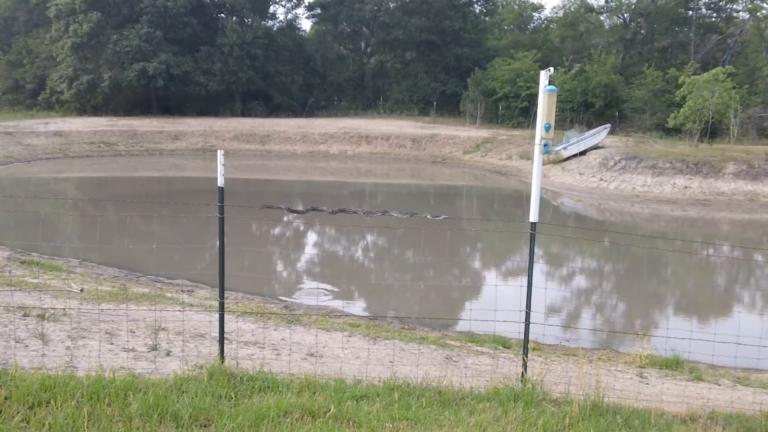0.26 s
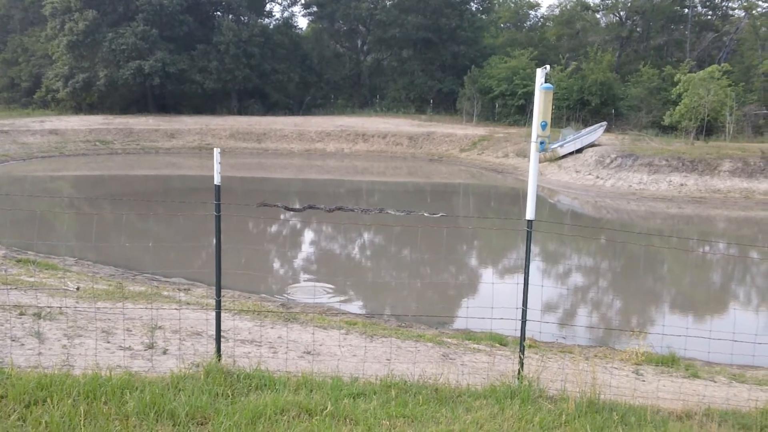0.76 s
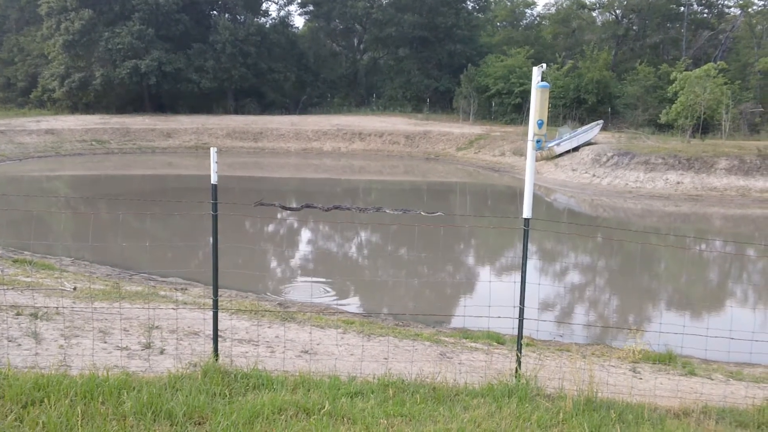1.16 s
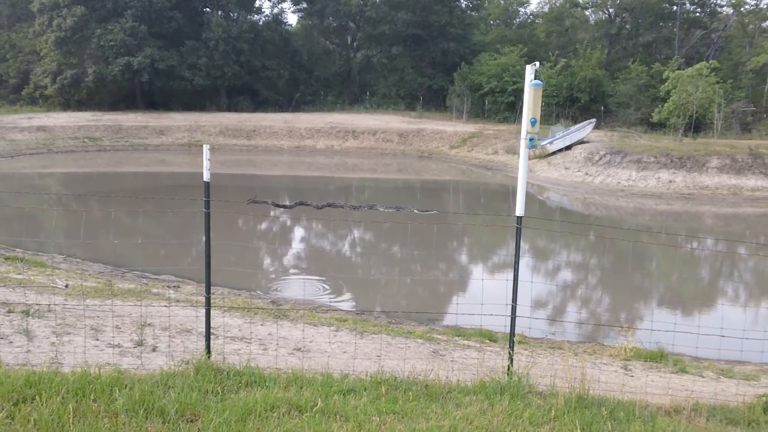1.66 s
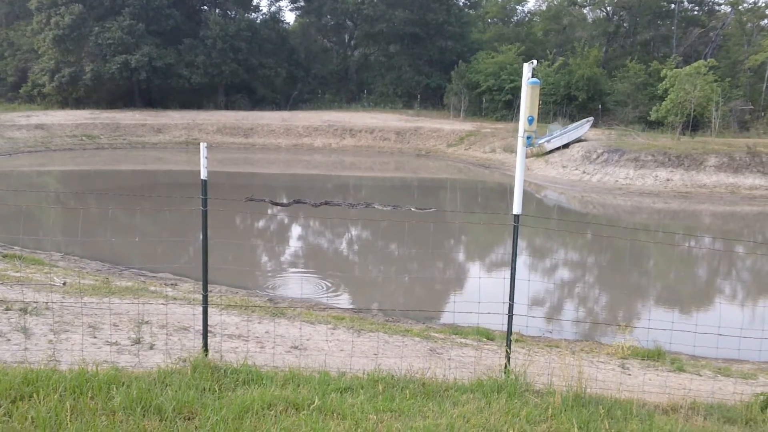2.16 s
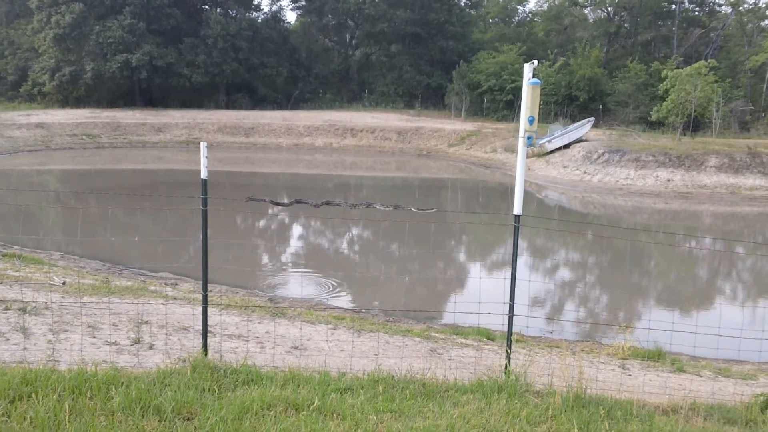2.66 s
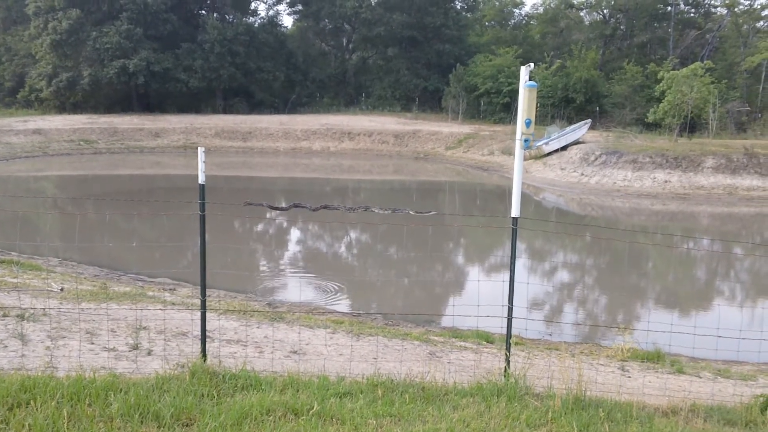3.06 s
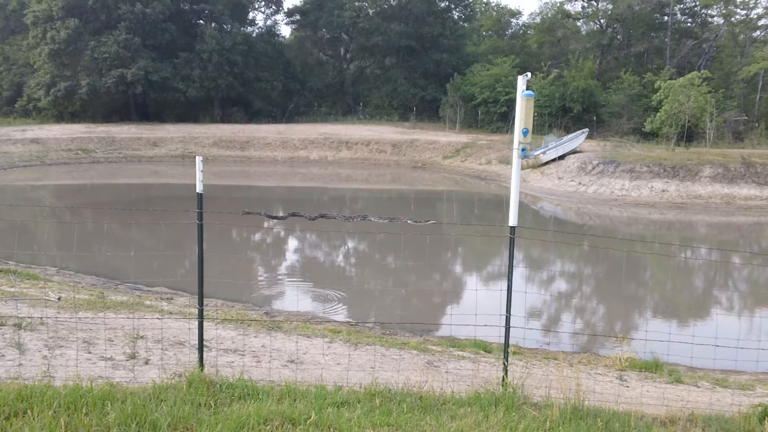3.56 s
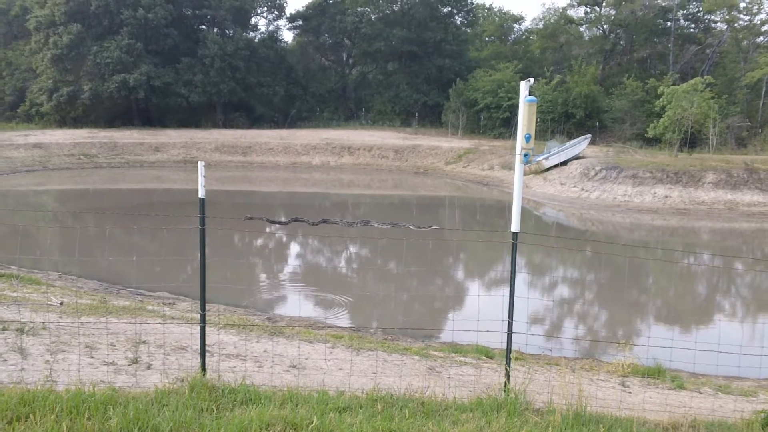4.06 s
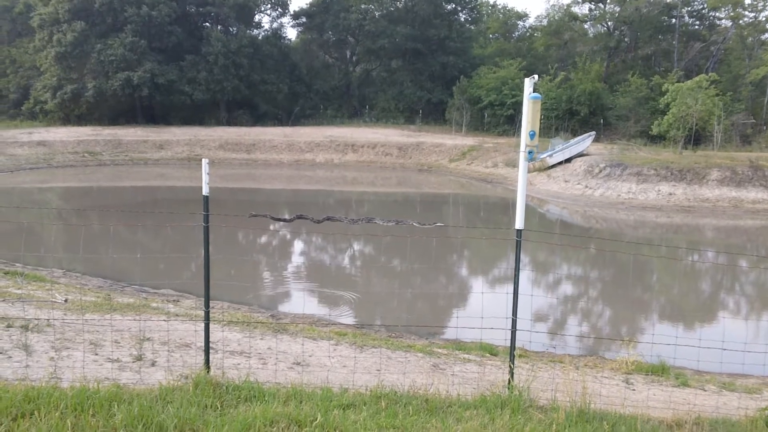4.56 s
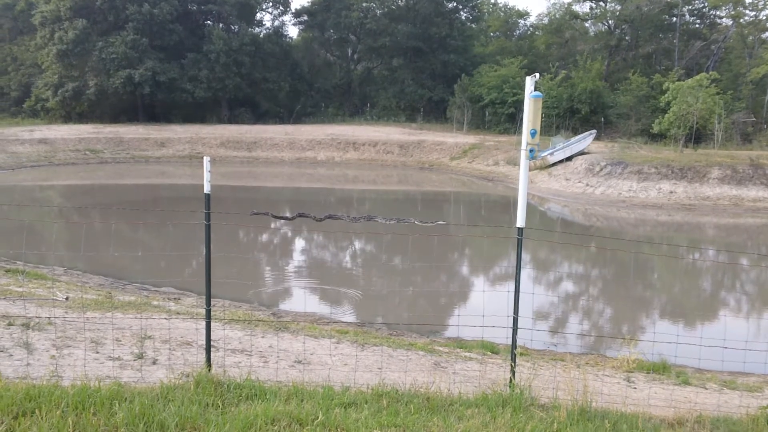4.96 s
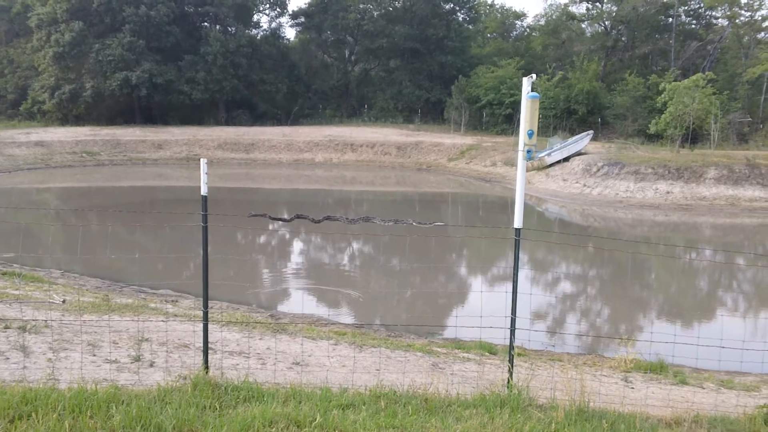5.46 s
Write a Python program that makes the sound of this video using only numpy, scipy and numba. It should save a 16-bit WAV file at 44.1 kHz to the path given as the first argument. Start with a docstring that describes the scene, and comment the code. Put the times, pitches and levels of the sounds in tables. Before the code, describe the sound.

At a pond beside a wood, insects keep up a steady high drone while a katydid ticks nearby and small birds chip. Three clear whistles sound, joined by softer falling notes. Then one bird, and soon a second, repeats a quick chirping phrase that echoes off the trees. Gusts of wind rumble and thump on the hand-held microphone, hardest just past the middle, over a faint distant motor hum.

```python
"""A farm pond at the edge of a wood, from a hand-held camera's microphone on the bank.
Air, a far motor and an insect drone are there from the start, with small birds chipping in the foliage.
A katydid starts ticking close by and a bird scolds. From 0.8 s come three long whistles, joined by
falling slurs, then a twitter; from 2.6 s one singer, then two, repeat a quick phrase, echoed by the trees.
Wind buffets the microphone, hardest at 3.7 s, where the gain control ducks and slowly recovers."""
import sys
import numpy as np
from scipy import signal
from scipy.fft import rfft, irfft
from scipy.io import wavfile
from scipy.ndimage import uniform_filter1d
from numba import njit

SR = 44100
rng = np.random.default_rng(int(sys.argv[2]) if len(sys.argv) > 2 else 0)


def bounce(signal):
    """Save signal as a 16-bit WAV file at the path given by the first command-line argument."""
    frames = np.transpose(np.atleast_2d(signal))
    limited = np.clip(frames, -1, 1)
    pcm = np.round(limited * 32767).astype(np.int16)
    wavfile.write(sys.argv[1], SR, pcm)


N = 251808
TIME = np.arange(N) / SR


def undb(db):
    """Decibels to gain."""
    return 10 ** (np.asarray(db) / 20)


def level(x, db):
    """Scale to an rms level."""
    return x * undb(db) / np.sqrt(np.mean(x ** 2))


def add(out, s, x):
    """Mix a sound in at s seconds."""
    i = max(int(s * SR), 0)
    out[i:i + len(x)] += x[:max(N - i, 0)]


def walk(rate_hz):
    """Smooth random wandering with a spread near 1."""
    k = int(SR / rate_hz)
    held = np.repeat(rng.standard_normal(N // k + 1), k)
    return level(uniform_filter1d(uniform_filter1d(held, k), k)[:N], 0)


def gain_at(hz, spectrum):
    """Gain of a (f/Hz, level/dB) spectrum at given frequencies."""
    f, db = np.transpose(spectrum)
    return undb(np.interp(np.log(hz + 1e-3), np.log(f), db))


def noise(spectrum):
    """Unit noise with a (f/Hz, level/dB) spectrum."""
    gain = gain_at(np.fft.rfftfreq(N, 1 / SR), spectrum)
    return level(irfft(rfft(rng.standard_normal(N)) * gain, N), 0)


def band(hz, width_hz):
    """Unit noise in one bell-shaped band."""
    bell = np.exp(-2 * ((np.fft.rfftfreq(N, 1 / SR) - hz) / width_hz) ** 2)
    return level(irfft(rfft(rng.standard_normal(N)) * bell, N), 0)


def phase_of(hz):
    """Running phase of a moving pitch."""
    return 2 * np.pi * np.cumsum(hz) / SR


def sing(contour, notes, waver=0.0021):
    """A bird's nearly pure tone follows the contour once for each (t/s, pitch factor, level/dB) note."""
    s, hz, db = np.transpose(contour)
    t = np.arange(s[0], s[-1], 1 / SR)
    swell = undb(np.interp(t, s, db)) * signal.windows.tukey(len(t), .1)
    pitch = uniform_filter1d(np.interp(t, s, hz), size=300)
    out = np.zeros(N)
    for start, factor, note_db in notes:
        unsteady = 1 + waver * walk(194)[:len(t)]
        add(out, start + s[0], undb(note_db) * swell * np.sin(phase_of(pitch * factor * unsteady)))
    return out


# open air and distant leaves: f/Hz, relative level/dB
AIR_SPECTRUM = [(20, -1.5), (60, 3.5), (170, -2), (350, -4.5), (720, -6), (1000, -11), (1700, -15),
                (3000, -18), (4500, -18), (6500, -23), (7600, -22.5), (9000, -25), (11000, -27),
                (15000, -29.5)]

def open_air(db=-45, flicker_db=0.63):
    """The air over the pond, faintly stirring."""
    return undb(db + flicker_db * walk(10)) * noise(AIR_SPECTRUM)


def far_motor(hz=122.5, db=-48, waver=0.02517, flutter_db=1.5):
    """A motor far off hums, slightly uneven in pitch and level."""
    hum = np.sin(phase_of(hz * (1 + waver * walk(14))))
    return level(hum * undb(flutter_db * walk(12)), db)


def insects(count=28, common_hz=5496, spread_hz=180, db=-51, stroke_hz=55, stroke_depth=0.8, swell_db=1.0):
    """Many insects, each a wing tone near the common pitch, pulsed at its own stroke rate."""
    drone = np.zeros(N)
    for offset in np.linspace(-2, 2, count):
        hz = common_hz + spread_hz * offset + 35 * walk(150)
        rate_hz = stroke_hz * rng.uniform(.65, 1.3) * (1 + 0.0303 * walk(5))
        strokes = 1 + stroke_depth * np.sin(phase_of(rate_hz))
        weight = np.exp(-(offset / 2) ** 2 * 0.92)  # loudest at the common pitch
        drone += weight * strokes * np.sin(phase_of(hz))
    return level(drone * undb(swell_db * walk(8)), db)


# strength of the wind on the bank: t/s, level/dB
GUSTS = [(0.0, -50), (0.17, -46), (0.52, -58.5), (1.57, -42), (1.72, -26), (1.89, -44), (2.05, -31.5),
         (2.45, -47), (3.23, -28.5), (3.45, -36), (3.62, -27.5), (3.86, -43), (4.15, -32.5), (4.26, -51),
         (4.68, -41.5), (4.72, -60), (4.79, -34), (4.86, -61), (5.07, -33), (5.14, -48.5), (5.37, -40),
         (5.71, -41)]
# wind rumble on the microphone: f/Hz, relative level/dB
RUMBLE_SPECTRUM = [(18, -30), (40, -4.5), (80, 2), (130, -3), (200, -14), (300, -20), (600, -53),
                   (1200, -72)]
# the hardest eddies that strike the microphone: t/s, peak level/dB, f/Hz
HARD_EDDIES = [(1.633, -20, 128), (1.724, -18, 124), (1.736, -11.5, 145), (2.04, -17.5, 164),
               (2.07, -16.5, 98), (2.128, -21.5, 150), (2.925, -20.5, 126), (3.008, -14.5, 152),
               (3.209, -17.5, 105), (3.396, -21.5, 120), (3.618, -15, 139.6), (3.654, -18, 113),
               (3.721, -7.5, 196), (3.737, -5.5, 198.6), (4.058, -20, 141), (4.103, -19, 187),
               (4.131, -22, 80), (4.191, -21.5, 129), (4.658, -17, 198), (4.793, -17.5, 137),
               (5.021, -19.5, 167), (5.055, -13, 176), (5.348, -18.5, 151), (5.404, -19.5, 194),
               (5.423, -20.5, 133), (5.656, -18.5, 144)]

def wind(count=70, rumble_db=-1, flutter_db=2.5, eddy_db=7, eddy_hz=135, knock_db=-15, knock_ratio=2.53):
    """Rumble and small eddies follow the gusts; each eddy is one swing of pressure between two dips."""
    gust_db = lambda s: np.interp(s, *np.transpose(GUSTS))
    out = noise(RUMBLE_SPECTRUM) * undb(gust_db(TIME) + rumble_db + flutter_db * walk(35))
    when, size, speed = rng.random((count, 3)).T
    times = (np.arange(count) + when) / count * N / SR
    small_eddies = zip(times, gust_db(times) + eddy_db + 6 * (size - .5), eddy_hz * 2 ** (speed - .5))
    t = np.arange(-.02, .02, 1 / SR)
    for s, db, hz in [*HARD_EDDIES, *small_eddies]:
        body = (np.pi * hz * t * .85) ** 2
        core = body * knock_ratio ** 2  # the tight core sharpens the crest into a knock
        swing = (1 - 2 * body) * np.exp(-body) + undb(knock_db) * (1 - 2 * core) * np.exp(-core)
        add(out, s + t[0], rng.choice([-1, 1]) * undb(db) * swing / swing.max())
    return out


# the clearest chips from the foliage, and the whistler's low rising note just after its first whistle: t/s,
# length/s, start f/Hz, middle f/Hz, end f/Hz, level/dB
CHIP_CALLS = [(0, .028, 7900, 7560, 7000, -51), (0, 0.022, 2520, 2500, 2450, -49.5),
              (.156, 0.026, 8100, 7140, 7000, -44), (.36, 0.069, 3650, 3400, 3300, -54),
              (.759, .025, 3700, 3400, 3120, -53), (.892, .041, 3860, 3550, 3100, -55),
              (1.062, 0.023, 1990, 2110, 2084, -44.5), (1.372, .16, 4160, 4090, 4030, -58),
              (1.46, .14, 2600, 2480, 2345, -50.5), (1.71, .04, 7300, 6900, 6300, -55),
              (3.007, 0.033, 6120, 5880, 5880, -41.5), (4.203, .07, 7500, 7380, 7100, -50),
              (4.218, 0.04, 6850, 6250, 6300, -45.5), (4.365, 0.061, 7100, 6900, 6800, -54),
              (4.409, 0.0295, 6920, 6200, 6150, -46), (4.515, 0.1, 7200, 6880, 6600, -52),
              (4.854, 0.026, 8160, 7300, 7260, -43), (5.27, .017, 6840, 7400, 7700, -48),
              (5.637, 0.054, 8200, 8060, 6400, -45)]

def chips(calls, rough=0.01):
    """Thin calls, mostly of small birds, each one curved and slightly husky sweep."""
    out = np.zeros(N)
    for s, length, *hz, db in calls:
        u = np.linspace(0, 1, int(length * SR))
        curve_hz = np.polyval(np.polyfit([0, .5, 1], hz, 2), u)
        pitch = curve_hz * (1 + rough * walk(720)[:len(u)])
        add(out, s, undb(db) * signal.windows.tukey(len(u), .5) * np.sin(phase_of(pitch)))
    return out


def far_chorus(count, low_hz, high_hz, db):
    """Birds deep in the wood: faint short whistles at any moment, mostly falling."""
    out = np.zeros(N)
    for when, pitch, length, fall in rng.random((count, 4)):
        u = np.linspace(0, 1, int((0.0303 + .06 * length) * SR))
        start_hz = low_hz + (high_hz - low_hz) * pitch ** 2
        hz = start_hz * (1 + (.04 - .2 * fall) * u)
        add(out, when * N / SR, undb(db) * np.sin(np.pi * u) * np.sin(phase_of(hz)))
    return out


# modes of a small katydid's wing: f/Hz, width/Hz, relative level/dB
WING_MODES = [(4000, 450, -15), (7700, 900, -13), (10650, 1100, 0), (14700, 1300, 3)]
# its runs of ticks: t/s, number of ticks
KATYDID_RUNS = [(.092, 3), (.412, 3), (.695, 3), (.879, 2), (1.183, 3), (1.504, 4), (1.844, 3), (2.128, 3),
                (2.315, 3), (2.596, 4), (3.235, 4), (3.574, 3), (3.86, 4), (4.197, 4), (4.422, 2),
                (4.896, 3), (5.087, 2), (5.365, 4)]

def katydid(db=-44, first_gap_s=.061, gap_s=.054, scatter=.012, uneven_db=2.5):
    """In the grass near the microphone: each tick is one wing snap, ringing for about a millisecond."""
    out, t = np.zeros(N), TIME[:SR // 200]
    for start, ticks in KATYDID_RUNS:
        for s in start + np.append(0, first_gap_s + gap_s * np.arange(round(ticks) - 1)):
            tune = 1 + scatter * rng.standard_normal()
            ring = sum(undb(mode_db) * np.exp(-np.pi * width * t) * np.sin(2 * np.pi * hz * tune * t)
                       for hz, width, mode_db in WING_MODES)
            add(out, s, undb(db + uneven_db * rng.standard_normal()) * ring)
    return out


# the scolding bird's throat: f/Hz, relative level/dB
THROAT_RESPONSE = [(2800, -10), (3500, -4), (3950, 5), (4400, 2), (4850, 1), (5600, -3), (6400, -30)]

def scolds(count=10, start_s=.153, every_s=.089, note_s=.06, top_hz=442, rise=.13, rough=0.0197,
           peak_s=0.41, peak_db=-51, fade_db_per_s=7.5):
    """Nasal notes swell and fade in the foliage: the throat passes a rising buzz's high harmonics."""
    out, u = np.zeros(N), np.linspace(0, 1, int(note_s * SR))
    for s in start_s + every_s * np.arange(count):
        db = peak_db - fade_db_per_s * abs(s - peak_s)
        hz = top_hz * (1 - rise * (1 - u) ** 2 + rough * walk(290)[:len(u)])
        phase = phase_of(hz)
        voice = sum(gain_at(k * hz, THROAT_RESPONSE) * np.sin(k * phase + rng.uniform(0, 2 * np.pi))
                    for k in range(6, 15))
        add(out, s, level(voice * signal.windows.tukey(len(u), .7), db))
    return out


# one long whistle: t/s from its start, f/Hz, relative level/dB
WHISTLE_CONTOUR = [(0, 2976, -0.5), (.012, 2730, -6), (.04, 2695, 1), (.115, 2698, 1.5), (.142, 2630, 0.5),
                   (.168, 2452, 0.5), (.176, 2330, -12)]
# each time it sounds: t/s, pitch factor, level/dB
WHISTLE_NOTES = [(0.832, 1, -37), (1.187, 1, -34.5), (1.552, .983, -35.5)]

def whistles():
    """Three long whistles carry across the pond, each held and then dropping in pitch."""
    return sing(WHISTLE_CONTOUR, WHISTLE_NOTES)


# short dry rasps: t/s, length/s, level/dB
RASP_CALLS = [(0.854, 0.11, -57), (4.052, 0.1, -57), (4.237, 0.27, -62), (4.7, .11, -59)]

def rasps(hz=7200, width_hz=1700):
    """Brief hissing calls from the trees."""
    swell = np.zeros(N)
    for s, length, db in RASP_CALLS:
        add(swell, s, undb(db) * signal.windows.tukey(int(length * SR), .5))
    return swell * band(hz, width_hz)


# one falling slur: t/s from its start, f/Hz, relative level/dB
SLUR_CONTOUR = [(0, 2720, -8), (.025, 2480, 2), (.055, 2150, 4), (.1, 1880, 3), (.13, 1730, -6.5)]

def slurs(count=6, start_s=1.072, every_s=.296, db=-54):
    """A bird farther from the microphone repeats its slur at an even pace."""
    return sing(SLUR_CONTOUR, [(start_s + k * every_s, 1, db) for k in range(count)])


def twitter(count=4, start_s=1.862, every_s=.095, note_s=.052, db=-51.5, fade_db_per_s=29):
    """One rising chip repeated in the foliage, softer each time."""
    sweep_hz = (3790, 4030, 4160)
    return chips([(start_s + t, note_s, *sweep_hz, db - fade_db_per_s * t)
                  for t in every_s * np.arange(count)])


# the three parts of a quick phrase: t/s from its start, f/Hz, relative level/dB
ARCH_CONTOUR = [(0, 2250, -10), (.01, 2459, -4), (.024, 2487, -0.5), (.038, 2458, 2.5), (.05, 2260, -5),
                (.057, 2180, -5.5)]
FLICK_CONTOUR = [(0.062, 2777, -16), (.069, 2611, -10.5), (.074, 2442, -3), (.079, 2340, -1.5),
                 (.087, 2080, -18)]
LIFT_CONTOUR = [(.087, 1994, -7), (.107, 2007, -7), (.127, 2080, 3.5), (.138, 2160, -3), (.148, 2150, -20)]
# two singers: first pitch factor, share of pitch lost per s, flick and lift level/dB against the arch
SINGER_VOICES = [(1.007, 0.0014, 1, -15), (1.012, 0.0538, 1.9, -6)]
# their phrases: t/s, arch level/dB, singer (0 or 1)
SONG_PHRASES = [(2.579, -37.5, 0), (2.773, -33.5, 0), (2.957, -31.5, 0), (3.135, -31.5, 0), (3.318, -32, 0),
                (3.506, -33, 0), (3.577, -37, 1), (3.697, -34.5, 0), (3.762, -35, 1), (3.937, -37, 1),
                (4.119, -36, 1), (4.3, -36, 1), (4.494, -36.5, 1), (5.621, -40.5, 0)]

def song(singer, pause_s=.3):
    """One bird's phrases, sagging in pitch: an arch, a downward flick and a low lift into the next."""
    factor, sag, flick_db, lift_db = SINGER_VOICES[singer]
    s, db = np.transpose([(s, db) for s, db, who in SONG_PHRASES if round(who) == singer])
    pitch = factor * (1 - sag * (s - s[0]))
    arches = sing(ARCH_CONTOUR, zip(s, pitch, db))
    flicks = sing(FLICK_CONTOUR, zip(s, pitch, db + flick_db))
    goes_on = np.append(np.diff(s) < pause_s, False)  # no lift before a pause
    lifts = sing(LIFT_CONTOUR, np.column_stack([s, pitch, db + lift_db])[goes_on])
    return arches + flicks + lifts


def wood(x, t60_s, db, build_s):
    """Trunks and leaves scatter a call into a tail that builds up and fades."""
    t = TIME[:SR]
    tail = rng.standard_normal(SR) * (1 - np.exp(-t / build_s)) * undb(-60 * t / t60_s)
    return undb(db) * signal.fftconvolve(x, tail / np.sqrt(np.sum(tail ** 2)))[:N]


def scene():
    """The pond as it reaches the bank: nearly mono, with a little width in the hiss."""
    first_singer, whistler = song(0), whistles()
    singers = first_singer + song(1) + whistler + slurs()
    add(singers, s=.083, x=undb(-8.5) * first_singer)  # echo off the tree line across the water
    singers += wood(singers, t60_s=0.17, db=-14, build_s=0.0053)  # branches around the perch
    singers += wood(singers, t60_s=1.7, db=-12.5, build_s=0.035)  # the wood beyond
    small_birds = chips(CHIP_CALLS) + twitter() + scolds() + rasps()
    small_birds += far_chorus(count=40, low_hz=1900, high_hz=3000, db=-59)
    small_birds += far_chorus(count=8, low_hz=3300, high_hz=4350, db=-60)
    small_birds += wood(small_birds, t60_s=0.42, db=-7.5, build_s=0.027)  # deep foliage blurs them more
    far_bank = wood(whistler, t60_s=1.34, db=-20, build_s=.2)
    mid = singers + small_birds + far_bank + insects() + katydid() + far_motor() + open_air() + wind()
    side = undb(-65) * noise([(60, -19), (500, 3.5), (3000, -2.5), (6000, -1.5), (9000, 3),
                              (11500, -8.5), (15000, -4)])
    return np.array([mid + side, mid - side])


@njit
def follow_peaks(x, release):
    """Peak follower: jumps up at once and sinks slowly."""
    out, peak = np.empty(len(x)), 0.
    for i in range(len(x)):
        peak = max(x[i], peak * release)
        out[i] = peak
    return out


def record(dry, limit_db=-10.0, release_s=0.86, notch_hz=12650, notch_q=10, top_hz=15350):
    """The camera's gain control holds down peaks; it has a narrow treble notch and cuts the top."""
    peak = follow_peaks(np.abs(dry).max(axis=0), np.exp(-1 / (release_s * SR)))
    gain = uniform_filter1d(np.minimum(1, undb(limit_db) / (peak + 1e-9)), size=64)
    notch = signal.tf2sos(*signal.iirnotch(notch_hz, notch_q, fs=SR))
    notched = signal.sosfilt(np.vstack([notch, notch]), dry * gain)
    return signal.sosfilt(signal.ellip(10, .2, 80, top_hz, fs=SR, output="sos"), notched)


dry = scene()
out = record(dry)
bounce(out)
```